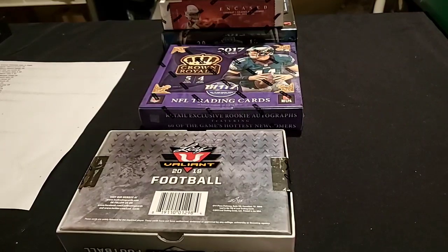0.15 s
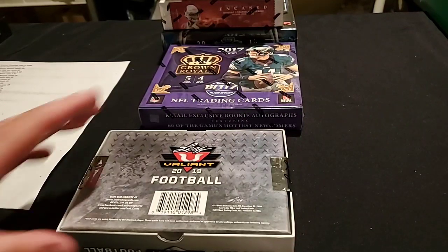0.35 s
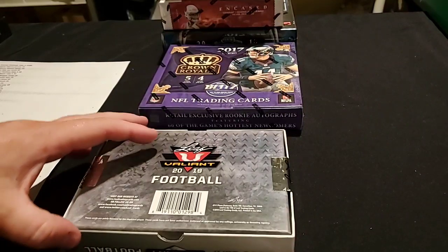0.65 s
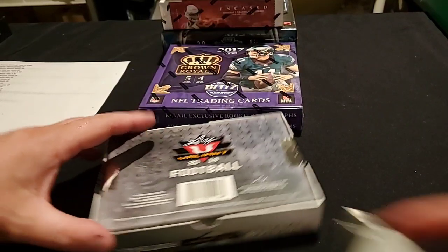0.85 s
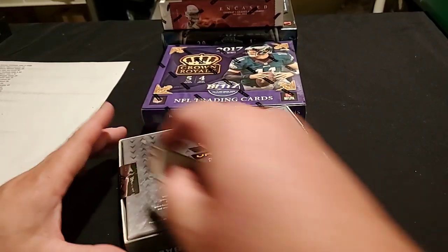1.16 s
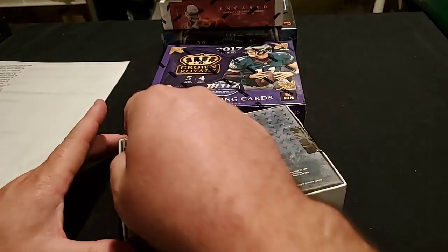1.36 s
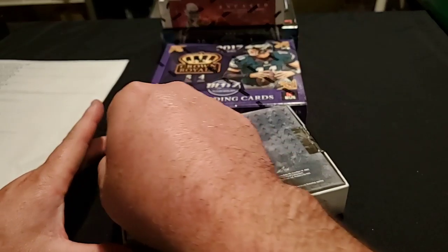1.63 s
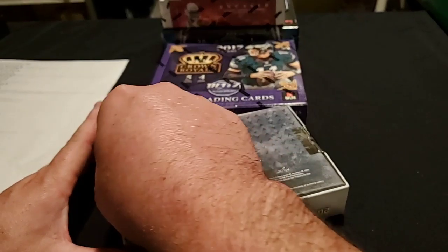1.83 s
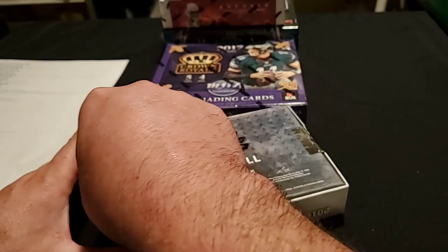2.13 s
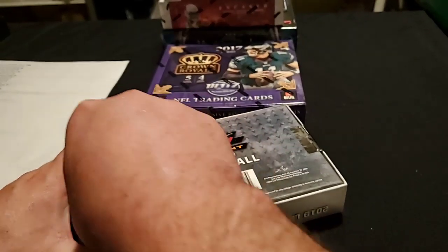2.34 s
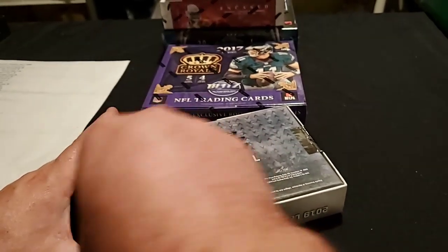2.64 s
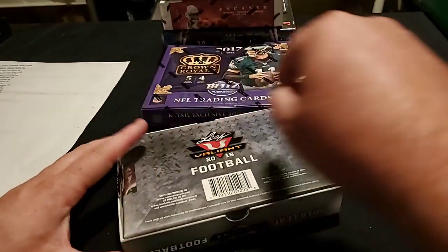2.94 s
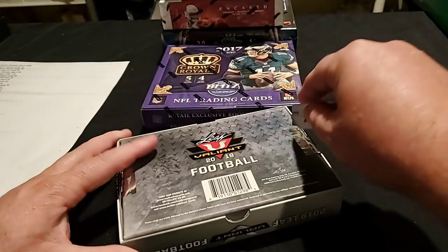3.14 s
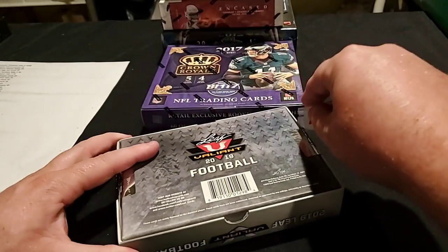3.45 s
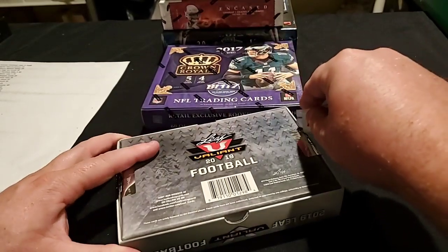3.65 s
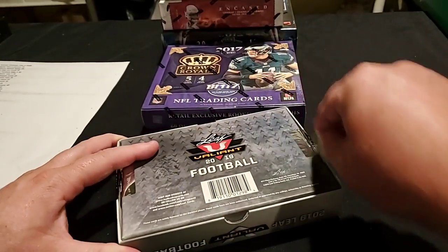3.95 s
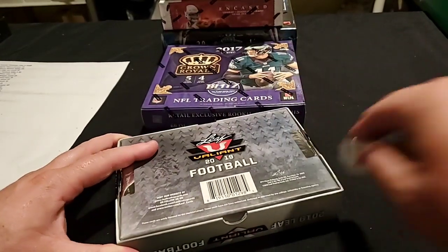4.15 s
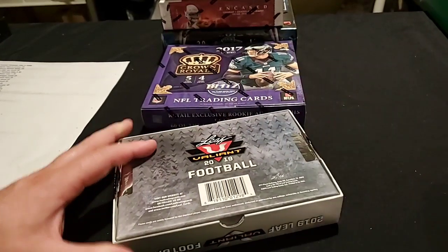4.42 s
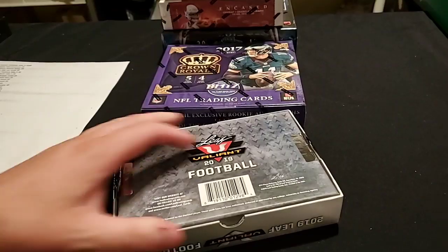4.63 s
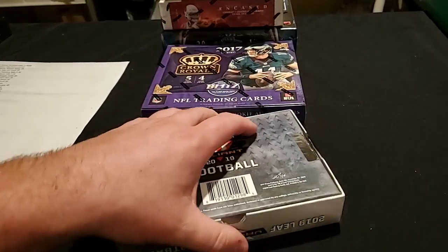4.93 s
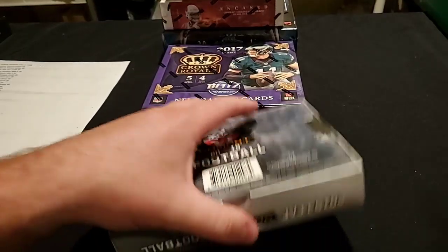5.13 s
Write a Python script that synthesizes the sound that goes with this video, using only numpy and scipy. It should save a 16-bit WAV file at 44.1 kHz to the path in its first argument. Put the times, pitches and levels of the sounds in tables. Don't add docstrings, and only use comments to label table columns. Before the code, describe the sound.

Close, dry handling of a small hollow card box: soft scuffing, sharp seal-cutting cracks, faint film crackle and a heavy double knock late on.

```python
import sys
import numpy as np
from scipy import signal
from scipy.fft import rfft, irfft
from scipy.io import wavfile

SR = 44100
rng = np.random.default_rng(int(sys.argv[2]) if len(sys.argv) > 2 else 0)


def wav_record(signal):
    frames = np.transpose(np.atleast_2d(signal))
    bounded = np.clip(frames, -1, 1)
    quanta = np.round(bounded * 32767).astype(np.int16)
    wavfile.write(sys.argv[1], SR, quanta)


def convert_level_to_amplitude(level_db):
    exponent = np.asarray(level_db, float) / 20
    return 10 ** exponent


N = 233009

# frequency in Hz, level in dB per Hz.
BACKGROUND_COLOR = [(410, -46), (700, -2), (891, -35.5), (949, -36.5), (1420, -10.5), (2060, 3.5),
                    (2310, -8), (2580, -17.5), (3290, -16.5), (3980, -12.5), (4630, -21.5), (7130, -23.5),
                    (12800, -41), (14000, -17), (14500, -29)]
# time in seconds, background level in dB.
GATE = [(0.0, -68), (.4, -70), (.56, -102), (.74, -66), (.92, -72), (1.04, -69), (1.42, -65), (1.53, -100),
        (1.78, -76), (1.87, -99), (2.44, -71), (2.75, -80.5), (3.14, -71.5), (3.65, -75.5), (4.22, -79),
        (4.44, -76), (4.6, -74.5), (5.28, -68)]
# frequency in Hz, time to fall 60 dB in seconds.
ROOM_DECAY = [(300, 0.13), (1100, 0.14), (3000, 0.083), (8000, 0.11), (14000, 0.035)]
# frequency in Hz, level in dB per Hz.
HISS_COLOR = [(410, -41), (700, -6), (825, -15.5), (925, -5.5), (1130, -6), (1370, -3), (1980, 0.5),
              (4930, -3.5), (6780, -3), (8190, -7), (12800, -7), (14000, -4), (14500, -23)]
# frequency in Hz, level in dB per Hz.
HUM_COLOR = [(65, -38), (110, -13), (162, -11), (220, -8), (416, -6.5), (519, -14), (711, -17), (879, -28),
             (1000, -16.5), (1300, -50), (2200, -120)]
# start in seconds, end in seconds, hiss at the start in dB,
# hiss at the end in dB, brightness in dB per octave.
STROKES = [(0.0, 0.23, -57, -58.5, 0.5), (0.221, .31, -58, -46.5, 0.5), (0.298, 0.548, -57, -73.5, 0),
           (0.571, 0.726, -60, -70, 0), (0.742, 0.93, -50.5, -44.5, 0.5), (0.944, 1.033, -43, -54.5, -1.5),
           (1.08, 1.207, -56, -55, -1.5), (1.217, 1.537, -62.5, -73.5, -1.5), (1.798, 1.857, -42.5, -58, 0),
           (1.87, 2.074, -67, -49, 1.5), (2.078, 2.243, -62, -66, -2), (2.273, 2.403, -46, -74, 0.5),
           (2.413, 2.586, -61.5, -40, -0.5), (2.628, 2.698, -49, -48, -3), (2.79, 2.859, -54, -63.5, 0),
           (2.925, 3.017, -48.5, -65.5, -1.4), (3.477, 3.675, -74.5, -65.5, -5.5),
           (3.668, 3.7, -60.5, -64, 4), (3.708, 3.954, -51.5, -52.5, -2), (3.96, 4.132, -47, -47, -1.5),
           (4.175, 4.424, -68.5, -64.5, 0), (4.447, 4.598, -46, -92, 2.5), (4.582, 4.85, -59.5, -67, 3.5),
           (4.861, 5.063, -57, -54, 2), (5.074, 5.271, -59.5, -57.5, 0)]
# time in seconds, box hum in dB, share passed to the table in dB.
HAND_WEIGHT = [(0.0, -59.5, -2.5), (0.2, -68, -2.5), (0.54, -80, 1), (0.79, -108, -4.5), (0.94, -66, 7),
               (1.09, -65, 4), (1.4, -68.5, -11), (1.53, -69, -4.5), (1.82, -105, 15), (1.96, -69.5, 8.5),
               (2.13, -64, 5.5), (2.29, -74.5, -2), (2.48, -62, -4), (2.59, -72, 11), (3.4, -72, -6),
               (3.91, -67.5, -7), (4.22, -79, 6), (5.28, -62, 5)]
# middle in seconds, half length in seconds,
# box hum in dB, table rumble in dB.
HEAVES = [
    (0.364, 0.063, -68.5, -86),
    (0.635, 0.068, -98, -66),
    (0.795, 0.055, -82, -67),
    (1.878, 0.093, -67, -85),
    (2.493, 0.069, -69, -54),
    (3.033, 0.019, -72, -51),
    (3.566, 0.06, -68, -63.5),
    (3.775, 0.055, -67.5, -61.5),
    (4.097, 0.015, -49, -46),
    (5.247, 0.047, -45, -49),
]
# middle in seconds, half length in seconds, level in dB, pitch in Hz.
RUSTLES = [(.25, 0.038, -57.5, 3200), (0.383, 0.012, -56, 2900), (0.443, 0.014, -60, 2800),
           (0.59, 0.036, -70, 3300), (1.52, 0.073, -83, 920), (3.3, 0.14, -81.5, 6700),
           (3.26, 0.095, -78.5, 4300), (3.23, 0.039, -74.5, 2670), (3.51, 0.029, -70, 3330),
           (3.93, .04, -63, 6800), (3.77, 0.033, -63, 9800), (3.95, 0.013, -56, 7400),
           (4.125, 0.018, -52.5, 4600), (2.87, 0.025, -59, 1400), (3.515, 0.023, -63.5, 1810),
           (3.82, 0.13, -61, 1080), (4.09, 0.016, -46.5, 930), (4.387, 0.044, -70, 5340),
           (5.234, 0.021, -56.5, 2300)]
# start in seconds, peak in dB, pitch in Hz, time to fall 60 dB in seconds.
CLEAN_RINGS = [(0.9353, -21, 1870, 0.022), (0.9356, -34, 1175, 0.042), (0.935, -29, 2800, 0.007),
               (0.9358, -30, 1520, 0.019), (0.9354, -35.5, 902, 0.05), (1.3028, -43.5, 1240, 0.01),
               (1.3026, -41, 1850, .006), (1.7169, -49, 6900, 0.0068), (2.2534, -27, 2200, .012),
               (2.2535, -25, 4600, 0.008), (2.2566, -16, 1830, .014), (2.2566, -16.5, 2320, 0.007),
               (2.2566, -16, 3810, 0.011), (2.2566, -24, 4940, 0.015), (2.2568, -25, 6400, .012),
               (2.2572, -27.5, 7050, 0.012), (2.5365, -21, 2030, 0.014), (2.5359, -15, 2915, 0.015),
               (2.5365, -17, 3450, 0.0055), (2.5361, -22, 4110, 0.013), (2.537, -29, 960, .03),
               (2.5362, -26, 5950, .006), (2.5362, -31, 7260, 0.0072), (2.584, -32.5, 2900, 0.012),
               (2.584, -30, 4530, 0.0088), (3.266, -62, 4000, .006), (3.347, -60, 6980, .006),
               (3.455, -53.5, 4000, 0.0074), (3.481, -50, 3580, 0.009), (3.4955, -43, 4570, 0.0063),
               (3.6185, -43.5, 6600, 0.0071), (3.6185, -50, 2970, .006), (3.9856, -20, 3230, 0.014),
               (3.9854, -25.5, 7400, 0.014), (3.9856, -30, 5470, .008), (3.992, -27.5, 965, 0.028),
               (4.0133, -24.5, 4340, 0.0086), (4.0132, -26, 7440, .012), (4.1084, -35, 1860, 0.02),
               (4.6032, -20, 6600, 0.006), (4.6085, -22.5, 417, 0.062), (4.6085, -25.5, 3400, 0.029),
               (4.6085, -29, 640, .03), (4.6085, -18, 1970, .02), (4.6083, -24, 1357, 0.04),
               (4.608, -16, 5850, 0.005), (4.9232, -27.5, 1130, 0.018), (4.9235, -35, 2470, .012),
               (4.9232, -27, 5750, 0.0065), (4.9317, -29, 3050, 0.007), (4.925, -29, 531, .05),
               (1.0614, -30, 6800, 0.0034), (1.128, -40, 6000, .003), (1.1316, -40, 6500, .003),
              (1.1398, -44, 6000, .003), (1.1522, -36, 5600, .003), (1.158, -35.5, 3000, 0.0037),
              (1.164, -36, 6500, .003), (1.1665, -39, 4500, .003), (1.2125, -44.5, 6140, .006),
              (1.3642, -39, 3100, .008), (1.4158, -46, 2700, .012), (1.441, -52, 6500, 0.0028),
              (2.2566, -20, 8900, .006), (2.5379, -24.5, 444, 0.035), (2.673, -38, 399, 0.046),
              (2.836, -46, 1450, .025), (3.709, -50, 130, .08), (4.196, -58, 2100, .015),
              (4.196, -58, 7500, .004), (4.427, -56, 7000, .004), (4.438, -49, 7000, .005),
              (4.438, -55, 3200, .006), (4.447, -44, 1790, .012), (4.6119, -23, 414, 0.064),
              (4.925, -31.5, 1480, 0.023), (0.2948, -38, 3000, .012), (0.737, -47, 3400, .005),
              (0.748, -45, 5800, .005), (0.758, -45, 3900, .008), (0.918, -44, 7400, .005),
              (0.918, -46, 2800, .006), (1.159, -42, 5500, .004), (2.2629, -27, 570, .04),
              (2.2755, -30, 450, .04), (2.262, -36, 900, .04), (2.5365, -22, 2550, .006),
              (2.5375, -41, 1250, .03), (2.539, -36, 720, .05), (4.5995, -42, 2600, .012),
              (4.608, -22, 4750, .008), (4.6033, -22, 2150, .008), (4.616, -33, 2400, .04),
              (4.9345, -32, 232, .08), (4.9235, -33, 7100, .008), (4.9235, -36, 1050, .025),
              (4.9315, -33, 5400, .006), (4.9255, -31, 331, .07),
               (1.7585, -46, 6500, .005), (1.7585, -50, 12500, .004), (1.789, -36, 3600, .004),
               (1.803, -40, 3300, .007), (1.894, -52, 6000, .004), (2.2566, -24, 11000, .003),
               (2.5362, -24, 10000, .003), (2.672, -38, 250, .06), (3.9854, -23, 10500, .003),
               (4.0133, -29, 10500, .003), (4.6033, -23, 9500, .003), (4.612, -34, 3300, .04),
               (4.9235, -32, 10000, .003), (1.262, -56, 8500, .004), (1.587, -66, 6500, .005),
               (3.9858, -23, 2000, .01), (3.9858, -27, 950, .012), (2.674, -42, 3300, .01)]
# start in seconds, peak in dB, pitch of the spot in Hz,
# upper wall modes in dB, table thud in dB.
KNOCKS = [(0.935, -36, 417, 6, -57), (1.163, -40, 423, -19, -54), (1.303, -65, 380, -16, -78),
          (1.79, -47, 197, 13.5, -71), (2.059, -31, 166, 8, -46), (2.2616, -17.5, 370, 7.5, -25),
          (2.5379, -22.5, 456, 5, -31), (2.669, -35.5, 378, -3, -34.5), (2.686, -81, 151, 8, -45),
          (2.835, -48, 367, -14, -57), (2.928, -46, 248, -10, -56), (2.999, -44, 164, -4, -47.5),
          (3.525, -47, 315, 3, -66), (3.557, -62, 258, -9, -63.5), (3.702, -44, 436, 13, -53.5),
          (3.748, -46.5, 285, 11, -75), (3.987, -23.5, 405, -11, -35), (4.01, -34, 425, -4, -31.5),
          (4.102, -34.5, 400, -9, -39), (4.442, -52, 282, -2, -76), (4.603, -13.5, 320, 3, -58),
          (4.607, -4, 308, -4, -29), (4.922, -14.5, 237, 4, -58), (4.942, -24, 176, -16, -45)]
# pitch in Hz, level in dB, time to fall 60 dB in seconds.
BOX_LOW_MODES = [(169, -6.5, 0.26), (191, -11, 0.041), (252, 1, 0.036), (335, -8, 0.1), (420, 2.5, 0.07),
                 (460.7, -10.5, 0.17), (525, -9.5, 0.06)]
# pitch in Hz, level in dB, time to fall 60 dB in seconds.
BOX_HIGH_MODES = [(590, -10, 0.072), (632, -11.5, 0.094), (730, -14.5, 0.06), (950, -19, 0.05),
                  (1030, -17.5, 0.0084), (1175, -12.5, 0.037), (1310, -15, 0.014), (1680, -7.5, 0.03),
                  (2030, -13.5, 0.021)]
# pitch in Hz, level in dB, time to fall 60 dB in seconds.
TABLE_MODES = [(55, -10, .16), (70, 0, .16), (92, -4, .13), (135, -10, .1)]
# start in seconds, peak in dB, ring in Hz, ring share in dB.
TIP_TICKS = [(0.1446, -48.5, 3300, 9), (0.205, -36, 3150, -12), (0.2844, -43, 3030, 9),
             (0.366, -52, 2650, 15), (0.38, -52, 2960, 9), (0.433, -54, 2780, 12), (0.597, -47.5, 3200, 14),
             (0.748, -39, 3650, 20), (0.937, -37, 1200, 9), (1.157, -35.5, 2540, -4),
             (1.7535, -49, 3980, -8), (2.4392, -26.5, 3340, -10.5), (2.583, -25.5, 3020, -4),
             (2.5857, -29, 2930, 14), (2.71, -35.5, 3330, 4), (2.964, -39.5, 4140, 6.5),
             (3.411, -55.5, 2220, 13.5), (3.454, -53, 3600, 22), (3.479, -60, 3970, 16),
             (3.496, -48.5, 3580, 28), (3.618, -43, 3010, 5), (3.6683, -55, 2000, 3),
             (3.7052, -22.5, 2540, -9.5), (4.0083, -24.5, 3290, -7), (4.094, -36, 3600, 4),
             (4.1937, -56.5, 3900, 7), (4.3944, -48.5, 3320, 13), (4.445, -26.5, 3290, -12),
             (4.9302, -17, 2890, -16.5)]
# start in seconds, peak in dB, ring in Hz, ring share in dB.
FILM_TICKS = [(0.2948, -29.5, 7450, 18), (1.0614, -40, 6580, 6), (1.081, -35.5, 12400, 1),
              (1.1274, -46, 5530, -3), (1.1314, -46, 6490, 0), (1.139, -37, 11300, -4),
              (1.152, -41, 5400, 5), (1.212, -51, 6200, 5), (1.7174, -42.5, 3620, -6),
              (1.9779, -49, 7500, 24), (2.4158, -41.5, 5100, -7), (2.4957, -39, 7720, -2),
              (2.7045, -33, 10200, 3), (2.778, -46, 5700, 9), (2.864, -32.5, 5800, 25),
              (2.8745, -31, 6300, 1), (2.9163, -39.5, 6100, 0), (2.926, -37, 7138, -5),
              (3.3358, -53, 4190, 0.5), (3.8762, -29, 4400, -33.5), (4.013, -20, 4300, -12),
              (4.866, -37, 12700, -18)]
# start in seconds, peak in dB, ring in Hz, ring share in dB,
# tilt of the broad noise in dB per octave.
CARD_SNAPS = [(0.5806, -44.5, 3000, -3, -11), (0.9354, -27, 1720, -10, -7), (1.1651, -35, 1170, -9, -3.5),
              (1.3025, -36.5, 1560, 5, -5.5), (1.3629, -41, 2700, 9, -2), (1.4145, -47.5, 2640, 3, -1.5),
              (1.782, -31, 3620, -6, 0.5), (2.0581, -34.5, 3570, 0, -6), (2.2525, -23, 2100, -28, -2.5),
              (2.2564, -8.5, 2030, -12, 3.5), (2.452, -39, 950, -24, -4), (2.536, -9.5, 2870, -10, 0.5),
              (2.6708, -26, 1050, -10, -14), (2.6885, -34, 1030, -1, 10), (2.836, -40, 1500, 6, -4),
              (2.997, -45.5, 1696, 8, -5), (3.7, -29, 2280, -16, -5.5), (3.9852, -14, 2950, -21, -6.5),
              (3.9925, -22.5, 1030, 2, 1), (4.024, -28, 1950, -8, -1.5), (4.1076, -38.5, 1810, 8, -4),
              (4.6029, -10, 1370, -10, -5), (4.608, -7.5, 1420, -21.5, -3.5),
              (4.9233, -18.5, 2860, -22, -3)]


def rms_one(x):
    return x / np.sqrt(np.mean(x ** 2) + 1e-20)


def to_db(gain):
    return 20 * np.log10(gain)


def at_hz(points, hz):
    table_hz, values = np.transpose(points)
    return np.interp(np.log(hz), np.log(table_hz), values)


def in_time(rows):
    s, *columns = np.transpose(rows)
    return [np.interp(np.arange(N) / SR, s, column) for column in columns]


def add(out, s, sound):
    i = round(s * SR)
    out[i:i + len(sound)] += sound[:N - i]


def drift(rate):
    r = np.exp(-80 * np.pi * rate / SR)
    slow = signal.lfilter([1], [1, -2 * r, r * r], rng.standard_normal(N // 40 + 2002))
    slow = rms_one(slow[2000:])
    return np.interp(np.arange(N) / 40, np.arange(len(slow)), slow)


def swell(middle, half):
    return np.exp(-((np.arange(N) / SR - middle) / half) ** 2)


def ring(push, hz, t60):
    r, w = convert_level_to_amplitude(-60 / (t60 * SR)), 2 * np.pi * hz / SR
    return signal.lfilter([0, np.sin(w)], [1, -2 * r * np.cos(w), r * r], push)


def bands(low_hz, high_hz, source, count=3):
    edges = np.geomspace(low_hz, high_hz, 1 + round(count * np.log2(high_hz / low_hz)))
    for k, (low, high) in enumerate(zip(edges, edges[1:])):
        band_filter = signal.butter(2, [low, high], "band", fs=SR, output="sos")
        yield np.sqrt(low * high), signal.sosfilt(band_filter, source[k % 2])


def fibres(grain_db):
    size_db = grain_db * np.minimum(rng.exponential(1, (2, N)), 5)
    return rng.standard_normal((2, N)) * convert_level_to_amplitude(size_db)


def background():
    back = 0
    for hz, noise in bands(700, 15000, rng.standard_normal((2, N)), count=6):
        back = back + convert_level_to_amplitude(at_hz(BACKGROUND_COLOR, hz) + 0.32 * drift(2.9)) * noise
    return rms_one(back)


def room(x):
    t, tail = np.arange(12000) / SR, 0
    tilt_db = -1
    for hz, noise in bands(200, 15000, rng.standard_normal((2, len(t)))):
        tail = tail + noise * convert_level_to_amplitude(tilt_db * np.log2(hz / 2000) - 60 * t / at_hz(ROOM_DECAY, hz))
    tail = tail * np.minimum(t / 0.0057, 1)
    return signal.fftconvolve(x, tail / np.sqrt(np.sum(tail ** 2)))[:N]


def table_rumble():
    shake = rng.standard_normal(N)
    return rms_one(sum(convert_level_to_amplitude(db) * ring(shake, hz, t60 / 3) for hz, db, t60 in TABLE_MODES))


def box_hum(share_db):
    hum, heave = 0, 0
    low_per_share, heave_tilt_db = 0.44, -3.5
    for hz, noise in bands(110, 1000, rng.standard_normal((2, N))):
        part = convert_level_to_amplitude(at_hz(HUM_COLOR, hz) + 3.6 * drift(7.3)) * noise
        octaves_below = np.maximum(np.log2(400 / hz), 0)
        hum = hum + convert_level_to_amplitude(low_per_share * share_db * octaves_below) * part
        heave = heave + convert_level_to_amplitude(heave_tilt_db * np.log2(hz)) * part
    return rms_one(hum), rms_one(heave)


def crackle(per_s, cycles):
    sizes = convert_level_to_amplitude(4.5 * np.minimum(rng.exponential(1, N), 4)) * rng.choice([-1, 1], N)
    born = rng.random(N) < per_s * convert_level_to_amplitude(5 * drift(15)) / SR
    dealt = rng.integers(0, 14, N)
    sound = 0
    for k, hz in enumerate(np.geomspace(1500, 13000, 14)):
        creases = sizes * born * (dealt == k) + 1e-18
        sound = sound + np.gradient(ring(creases, hz, cycles / hz)) * 3000 / hz
    return rms_one(sound)


def strokes(rest_db):
    t = np.arange(N) / SR
    attack_s, release_s = 0.028, 0.023
    tail_db, tail_db_per_s = 30, 118
    power, bright = convert_level_to_amplitude(2 * rest_db) + convert_level_to_amplitude(2 * -78.5), 0
    for start, end, first_db, last_db, tilt_db in STROKES:
        after = np.maximum(t - end, 0)
        rise_db = 20 * np.maximum(start - t, 0) / attack_s
        fall_db = np.minimum(20 * after / release_s, tail_db + tail_db_per_s * after)
        slide_db = np.interp(t, [start, end], [first_db, last_db])
        stroke = convert_level_to_amplitude(2 * np.maximum(slide_db - rise_db - fall_db, -200))
        power, bright = power + stroke, bright + tilt_db * stroke
    return 10 * np.log10(power), bright / power


def fibre_hiss(tilt_db):
    stutter, hiss = 0.5 * drift(60), 0
    for hz, noise in bands(700, 15000, fibres(grain_db=3.5), count=4):
        patches_db = stutter + 2.2 * drift(18) + tilt_db * np.log2(hz / 4000)
        hiss = hiss + convert_level_to_amplitude(at_hz(HISS_COLOR, hz) + patches_db + 1.4 * drift(3.7)) * noise
    return hiss / 1.53


def rubbing():
    (back_db,), (weight_db, share_db) = in_time(GATE), in_time(HAND_WEIGHT)
    hiss_db, tilt_db = strokes(back_db - 6)
    hum_db = to_db(convert_level_to_amplitude(weight_db) + convert_level_to_amplitude(hiss_db - 19))
    heave_db = to_db(1e-9 + sum(convert_level_to_amplitude(db) * swell(s, half) for s, half, db, _ in HEAVES))
    heave_rumble = sum(convert_level_to_amplitude(db) * swell(s, half) for s, half, _, db in HEAVES)
    rumble_db = to_db(convert_level_to_amplitude(weight_db + share_db) + heave_rumble)
    hum, heave = box_hum(share_db)
    layers = [(back_db, background()), (rumble_db, table_rumble()), (hum_db, hum), (heave_db, heave),
              (hiss_db - 17, crackle(per_s=160, cycles=8.9)), (hiss_db, fibre_hiss(tilt_db))]
    return sum(convert_level_to_amplitude(db) * layer for db, layer in layers)


def rustles():
    grain, out = fibres(grain_db=4.5)[0], 0
    for s, half, db, hz in RUSTLES:
        t60 = 8 / hz
        flap = ring(ring(grain, hz, t60), hz, t60)
        out = out + convert_level_to_amplitude(db) * swell(s, half) * rms_one(flap)
    return out


def pings():
    out, pull = np.zeros(N), -1 * (np.arange(4096) == 0)
    for k, (s, db, hz, t60) in enumerate(CLEAN_RINGS):
        add(out, s, (-1) ** k * convert_level_to_amplitude(db) * ring(pull, hz, np.clip(t60, .002, .08)))
    return out


def struck(modes, push, damping, favour_db, grip=1):
    sound = 0
    for (hz, db, t60), extra_db in zip(modes, favour_db):
        sound = sound + convert_level_to_amplitude(db + extra_db) * ring(push, hz * grip, t60 / damping)
    return sound / np.abs(sound).max()


def knocks():
    out, t = np.zeros(N), np.arange(12000) / SR
    tap, contact, shove = [np.gradient(t * np.exp(-t / soft_s)) for soft_s in (0.00026, 0.00055, 0.002)]
    damping = 1.53
    luck_db = 2.5 * rng.standard_normal((len(KNOCKS), 3, 9))
    for (s, db, hz, upper_db, thud_db), (low_luck, high_luck, table_luck) in zip(KNOCKS, luck_db):
        near_db = -8 * np.abs(np.log2(np.array(BOX_LOW_MODES)[:, 0] / hz))
        grip = 1 + table_luck[8] / 80
        box = struck(BOX_LOW_MODES, contact, damping, low_luck[:7] + near_db, grip)
        walls = convert_level_to_amplitude(upper_db - 11.5) * struck(BOX_HIGH_MODES, tap, damping, high_luck)
        thud = convert_level_to_amplitude(thud_db) * struck(TABLE_MODES, shove, 0.99, table_luck / 2)
        add(out, s, -convert_level_to_amplitude(db - 0.5) * (box + walls) - thud)
    return out


def snaps():
    out, t = np.zeros(N), np.arange(4096) / SR
    f = np.fft.rfftfreq(2 * len(t), 1 / SR) + 1
    rows = [(*row, 0.018) for row in CARD_SNAPS]
    rows += [(*row, 6, 0.024) for row in TIP_TICKS]
    rows += [(*row, -2, 0.01) for row in FILM_TICKS]
    for s, db, hz, ring_db, tilt_db, t60 in rows:
        fade = convert_level_to_amplitude(-60 * t / np.clip(t60, .002, .08))
        rise = np.minimum(t / (0.00016 + 1.1 * t60 ** 2), 1)
        burst = rng.standard_normal(len(t)) * fade * rise
        burst = burst + 1.48 * (t == 0)
        low_cut = f ** 3 / (f ** 3 + (0.52 * hz) ** 3)
        color = (f / 4000) ** (tilt_db / 6) * low_cut
        wide = irfft(rfft(burst, 2 * len(t)) * color)[:len(t)]
        flap = np.gradient(ring(burst, hz, 6 / hz))
        sound = wide / np.abs(wide).max() + convert_level_to_amplitude(ring_db) * flap / np.abs(flap).max()
        add(out, s, convert_level_to_amplitude(db) * sound / np.abs(sound).max())
    return out


def scene():
    blows = snaps() + knocks() + pings()
    return (blows + convert_level_to_amplitude(-15) * room(blows) + rubbing() + rustles())[None]


def band_limit(x):
    return signal.sosfilt(signal.butter(12, 14960, fs=SR, output="sos"), x)


def record(dry):
    rounded = .8 * np.tanh(dry / .8)
    top_cut = signal.ellip(8, 1, 36, 13900, fs=SR, output="sos")
    bass_cut = signal.butter(4, 42, "high", fs=SR, output="sos")
    return band_limit(signal.sosfilt(bass_cut, signal.sosfilt(top_cut, rounded)))


dry = scene()
out = record(dry)
wav_record(out)
```